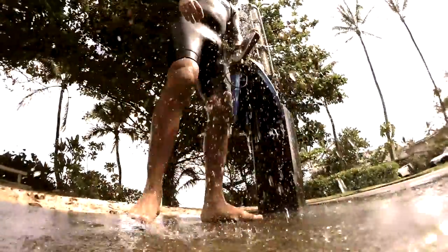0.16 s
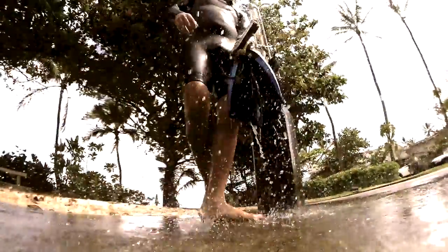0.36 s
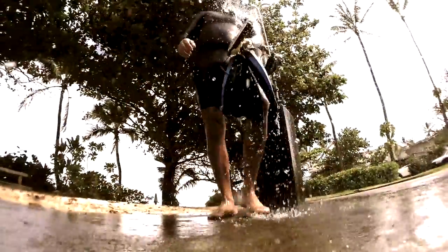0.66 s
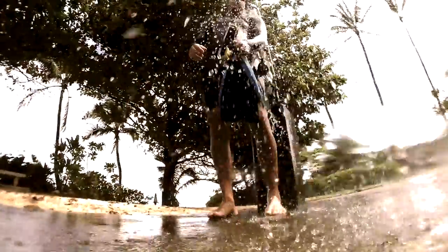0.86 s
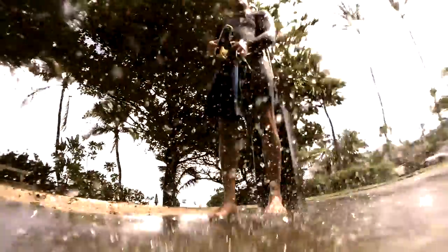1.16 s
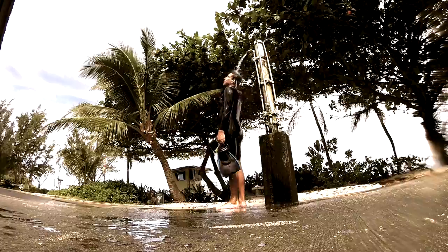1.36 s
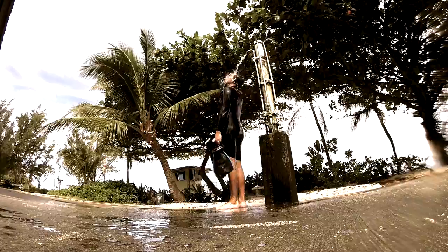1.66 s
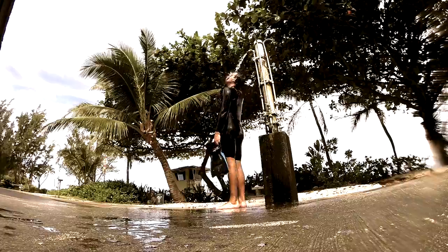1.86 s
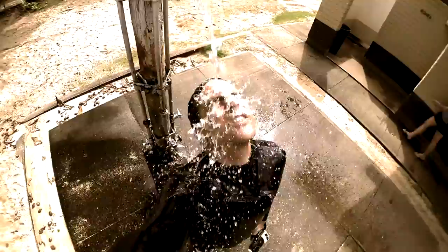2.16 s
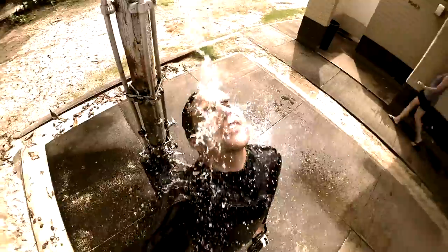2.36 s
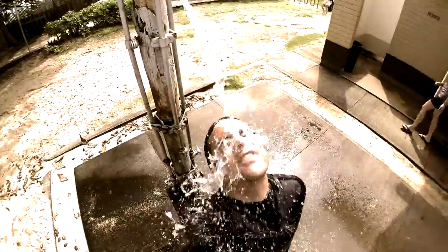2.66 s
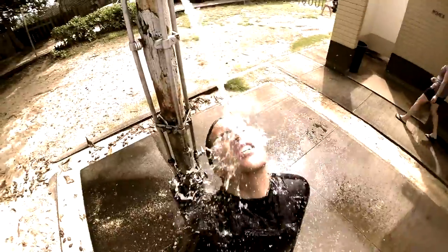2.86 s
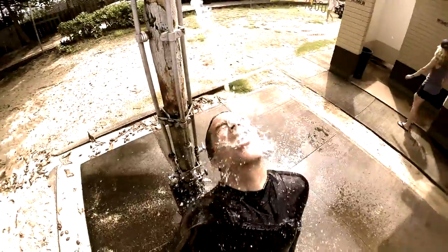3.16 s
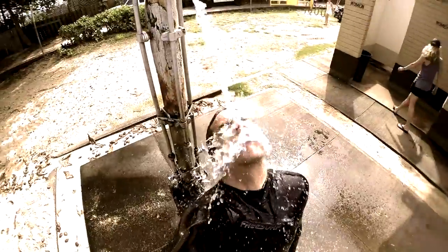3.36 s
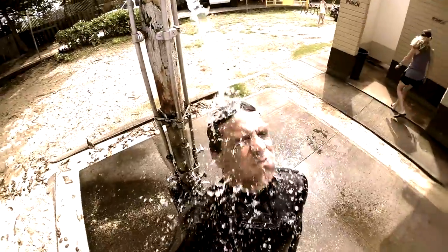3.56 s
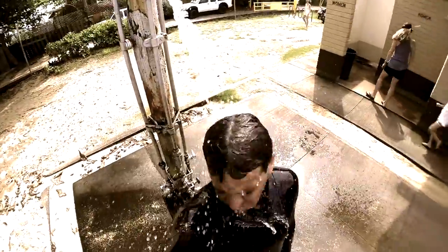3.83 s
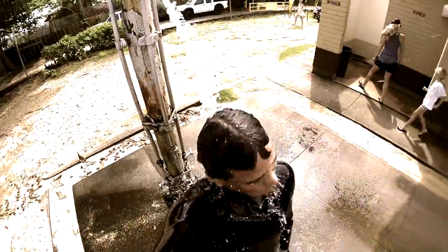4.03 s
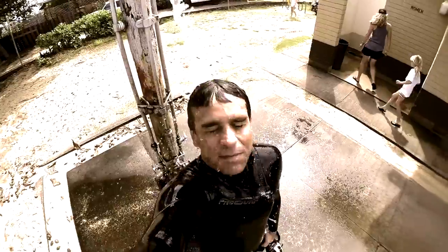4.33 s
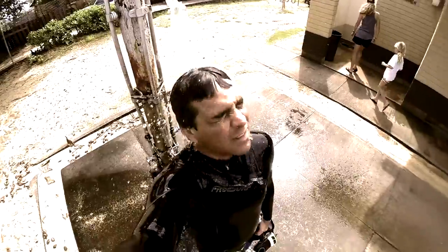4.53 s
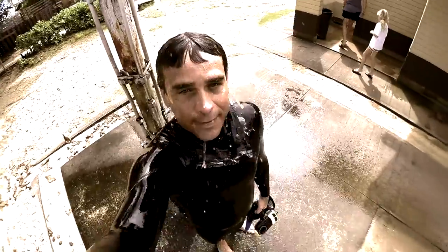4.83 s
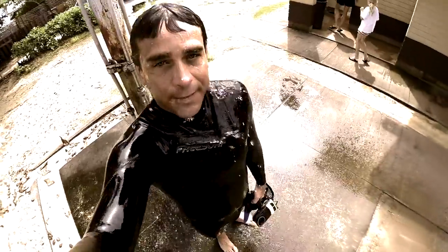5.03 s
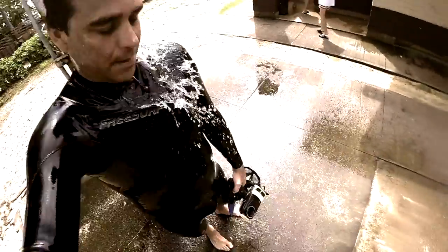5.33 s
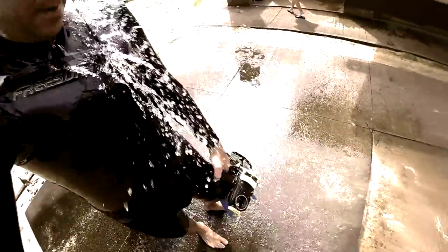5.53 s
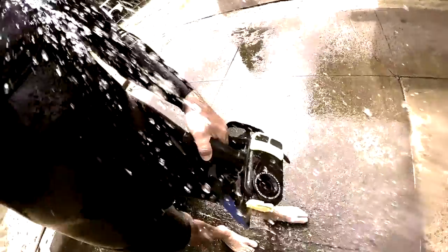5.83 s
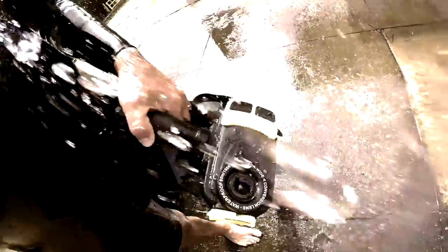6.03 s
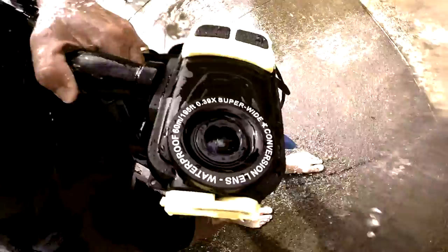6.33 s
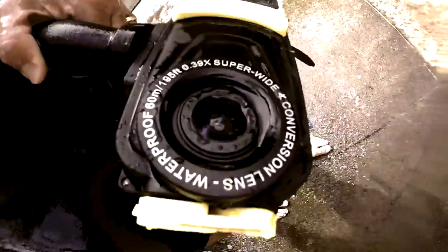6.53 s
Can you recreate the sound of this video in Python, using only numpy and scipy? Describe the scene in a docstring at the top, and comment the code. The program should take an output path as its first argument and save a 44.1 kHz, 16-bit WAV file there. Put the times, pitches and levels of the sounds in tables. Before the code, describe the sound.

An outdoor shower heard from inside a small waterproof housing. Spray sizzles and drops patter on wet concrete at once, over a faint hollow hiss. Big drops tick and thump on the casing, crowding into a dense splashing burst before the middle. The water thins almost to nothing, then returns with a few very hard smacks, thins again, and ends on a loud wet knock. Louder on the left.

```python
"""An outdoor shower on a bather and wet concrete, heard from inside a small waterproof camera housing.
From the start the shower head hisses (toned noise), small drops patter and fine spray sizzles on the ground
(showers of tuned noise bursts). Big drops soon smack the housing, which ticks, rings and thumps (tuned modes).
Then gushes fly off the bather (swells of patter and spray) and jolts shake the housing (damped low modes).
The water thins mid-way, then returns; the hardest smacks make the camera's gain control duck."""
import sys
import numpy as np
from scipy import signal
from scipy.fft import rfft, irfft
from scipy.io import wavfile
from scipy.ndimage import uniform_filter1d, minimum_filter1d

SR = 44100
rng = np.random.default_rng(int(sys.argv[2]) if len(sys.argv) > 2 else 0)


def generate_wav(sig):
    """Save sig (samples, or channels by samples) to the path in sys.argv[1] as 16-bit PCM at SR."""
    pcm = np.round(np.clip(np.atleast_2d(sig).T, -1, 1) * 32767).astype(np.int16)
    wavfile.write(sys.argv[1], SR, pcm)


N = 294840  # length in samples
SPLAT_S = .006  # window for the level of a splat and for the gain control's meter


def undb(db):
    """Decibels to gain."""
    return 10 ** (np.asarray(db) / 20)


def unit(x):
    """Scale to rms 1."""
    return x / np.sqrt(np.mean(x ** 2))


def bins(size):
    """Frequencies in Hz of a spectrum of that many samples, kept above zero."""
    return np.maximum(np.arange(size // 2 + 1), 1e-3) * SR / size


def colour(points, f):
    """Gain at frequencies f of an outline in f/Hz, level/dB, drawn over log frequency."""
    hz, db = np.transpose(points)
    return undb(np.interp(np.log(f), np.log(hz), db))


def resonance(f, hz, width):
    """Response of one damped mode, gain 1 at its centre."""
    return 1 / (1 + 1j * (f * f - hz * hz) / (f * width))


def body(f, modes):
    """The direct sound plus the ringing of some modes."""
    ringing = sum(undb(db) * resonance(f, hz, width) for hz, width, db in modes)
    return 1 + ringing


# Outline of the hiss before its tones: f/Hz, level/dB
JET_COLOUR = [(40, 5), (150, -3.5), (400, -4), (850, -13.5), (1200, -16), (2700, -9.5), (3400, -17.5),
              (5500, -15.5), (7000, -25.5), (15000, -32)]
# Hollow tones in the hiss: f/Hz, width/Hz, level/dB over the plain hiss
JET_TONES = [(633, 24, 6.5), (1018, 19, 19.5), (1470, 49, 12), (2030, 33, 10), (2960, 46, -8),
             (2840, 53, 9), (4120, 160, 5), (5470, 120, 4)]
JET_DB = -55  # rms level of the hiss


def jet():
    """Water rushing through the shower head: a smooth hiss with hollow tones."""
    f = bins(N)
    noise = rfft(rng.standard_normal(N))
    hiss = noise * colour(JET_COLOUR, f) * body(f, JET_TONES)
    return unit(irfft(hiss, N)) * undb(JET_DB)


# Water landing near the camera: t/s, patter level/dB, fine spray level/dB
WATER_FLOW = [(0, -43.5, -40.5), (0.328, -45, -44), (0.701, -40, -40), (1.19, -50.5, -44),
              (1.35, -45.5, -54.5), (1.9, -46.5, -51.5), (2.2, -61.5, -55.5), (2.65, -45.5, -51),
              (3, -57.5, -62.5), (3.4, -69, -67), (3.72, -57, -53.5), (4, -64, -54.5), (4.15, -50.5, -48.5),
              (5.28, -51, -49.5), (5.5, -59, -59), (5.95, -51, -49), (6.3, -55, -53), (6.68, -51, -49)]


def flow(column):
    """Gain of the patter (1) or the spray (2) that lands nearby, gliding between levels in dB."""
    rows = np.array(WATER_FLOW)
    return undb(np.interp(np.arange(N) / SR, rows[:, 0], rows[:, column]))


CROWDING = .65  # drops per second grow as this power of the water's gain


def clicks(rate, spread_db, water):
    """Impacts at random moments, many small and a few large; they thin out where there is less water."""
    count = int(rate * N / SR) + 1
    when, size, sign, luck = rng.random((count, 4)).T
    at = (when * N).astype(int)
    crowd = (water[at] / water.max()) ** CROWDING
    strength = undb(spread_db * size ** 3) * np.sign(sign - .5)
    # the fewer impacts that land are made stronger, so the average power holds
    landed = strength * (luck < crowd) / np.sqrt(crowd)
    return unit(np.bincount(at, landed, N))


def smear(x, decay_s):
    """Turn each impact into a ragged little burst of noise with an exponential decay."""
    energy = signal.lfilter([1], [1, -np.exp(-2 / (decay_s * SR))], x ** 2 + 1e-18)
    return unit(np.sqrt(energy) * rng.standard_normal(N))


# Ringing modes of the housing: f/Hz, width/Hz, level/dB over the direct sound
HOUSING_MODES = [(358, 7.9, -0.5), (1067, 49, -0.5), (1590, 420, 0.5), (1780, 250, -15.5), (2470, 540, 2),
                 (2800, 59, -0.5), (3510, 450, -3), (4435, 690, 4), (5706, 250, 5.5), (7230, 170, -5.5)]


def housing(f):
    """The housing passes the direct sound and rings at its own modes."""
    return body(f, HOUSING_MODES)


def shower(points, water, rate, spread_db, sharpness, burst_s, count):
    """A rain of drops in several sizes; each size bursts around its own pitch."""
    f = bins(N)
    pitches = np.geomspace(points[0][0], points[-1][0], count)
    rain = 0
    for hz in pitches:
        bursts = smear(clicks(rate / count, spread_db, water), burst_s)
        tuning = resonance(f, hz, hz / sharpness) ** 2
        rain = rain + colour(points, hz) / np.sqrt(hz) * tuning * rfft(bursts)
    return water * unit(irfft(rain * housing(f), N))


THUMP_HZ, THUMP_T60_S = 203.2, .11  # pitch, time to fall 60 dB


def thump(x):
    """The lowest mode of the housing: a short hollow knock."""
    t = np.arange(SR // 4) / SR
    ring = np.sin(2 * np.pi * THUMP_HZ * t) * np.exp(-np.log(1000) * t / THUMP_T60_S)
    # a small wall radiates little below its own pitch
    bass_cut = signal.butter(1, THUMP_HZ / 2, "high", fs=SR, output="sos")
    ring = signal.sosfilt(bass_cut, ring)
    return signal.fftconvolve(x, ring)[:N]


# Pitch balance of the small drops, before the housing rings: f/Hz, level/dB
PATTER_COLOUR = [(680, -2), (1500, 3), (2400, 3), (3400, -28), (6000, -17), (13000, -14.5)]
# Pitch balance of the fine spray, before the housing rings: f/Hz, level/dB
SPRAY_COLOUR = [(2800, -15), (4300, 6.5), (5700, -5), (7000, -1), (13000, -11)]
GUSH_SPRAY_DB = -2  # spray carried by a gush, against its patter


def small_drops(knock_db=-6, rumble_db=-15, rumble_hz=260, rumble_width_hz=700):
    """Patter and fine spray; the spray also keeps the housing knocking softly."""
    gush = gushes()
    coarse = np.hypot(flow(1), gush)
    fine = np.hypot(flow(2), undb(GUSH_SPRAY_DB) * gush)
    patter = shower(PATTER_COLOUR, coarse, rate=1700, spread_db=25, sharpness=1.55, burst_s=0.0024, count=10)
    spray = shower(SPRAY_COLOUR, fine, rate=2600, spread_db=27.5, sharpness=1.9, burst_s=0.0012, count=7)
    taps = clicks(rate=400, spread_db=14, water=fine)
    knocking = undb(knock_db) * unit(thump(taps))
    rumble = irfft(rfft(taps) * resonance(bins(N), rumble_hz, rumble_width_hz), N)
    return patter + spray + fine * (knocking + undb(rumble_db) * unit(rumble))


def splat_level(x, db):
    """Set each row to a level taken over the length of one splat."""
    loudness = np.sqrt(np.sum(x ** 2, axis=1, keepdims=True) / (SPLAT_S * SR))
    return x * undb(db)[:, None] / loudness


# Big drops on the housing: t/s, splat level/dB, splat f/Hz, spreading time/s,
# slap level/dB (before slap_db), level/dB of the impulse that drives the thump
BIG_DROPS = [(.142, -28, 4130, 0.00087, -33.5, -42), (0.203, -28, 1500, 0.0077, -26, -62),
             (.229, -18, 1920, 0.00093, -41, -33), (.231, -24, 3180, 0.0025, -46, -44),
             (0.3079, -21, 4030, 0.00049, -27.5, -36.5), (0.453, -30.5, 3940, 0.00046, -44.5, -47),
             (.503, -26.5, 1065, 0.0009, -32.5, -28.5), (0.708, -31, 1850, 0.0023, -31.5, -33),
             (0.8212, -21.5, 3940, 0.00087, -29.5, -29.5), (0.9347, -25.5, 1790, 0.0014, -26, -26.5),
             (1.3776, -28, 3000, 0.00039, -33, -66), (1.49, -25.5, 1340, 0.0037, -37.5, -55),
             (1.566, -37, 1930, 0.002, -42, -36.5), (1.6239, -26, 1350, 0.0055, -33.5, -33.5),
             (1.7053, -24, 1900, 0.0015, -31, -34), (1.744, -31.5, 1780, 0.0079, -37.5, -24.5),
             (1.93, -37, 2200, 0.0014, -43.5, -67), (1.9664, -28.5, 1900, 0.0039, -34, -34.5),
             (2.084, -37, 1410, 0.0023, -41, -45), (2.109, -35, 1320, 0.002, -52, -38.5),
             (2.232, -39, 1400, 0.00045, -44.5, -41), (2.294, -30, 1610, 0.0015, -38, -36),
             (2.311, -25.5, 1920, 0.00097, -46, -31), (2.361, -24.5, 1120, .0044, -22, -22),
             (2.3917, -23.5, 2500, 0.0011, -56, -48), (2.424, -28.5, 1990, 0.0018, -32.5, -41),
             (2.4696, -17, 1030, 0.00033, -22.5, -20.5), (2.539, -22.5, 3380, 0.00076, -26.5, -28),
             (2.554, -21, 1900, 0.0016, -28, -45), (2.5774, -21.5, 4150, 0.0023, -52, -48),
             (2.589, -27, 2630, 0.0024, -34, -30), (2.624, -18.5, 1500, 0.0013, -20, -21.5),
             (2.942, -38, 940, 0.0024, -48, -57), (3.08, -40, 1330, 0.00026, -54, -62),
             (3.237, -49, 4770, .0008, -70, -70), (3.465, -44.5, 1390, 0.0029, -58, -47.5),
             (3.663, -39, 1500, 0.0016, -54, -65), (4.034, -45, 5000, .002, -62, -55),
             (4.087, -41, 4050, .0027, -68, -43.5), (4.121, -37.5, 5600, 0.004, -69, -42),
             (4.183, -37.5, 2020, .002, -49, -38), (4.235, -20, 1920, 0.011, -33.5, -40),
             (4.255, -22, 3020, 0.001, -55, -30), (4.279, -30, 4200, 0.00046, -46, -51),
             (4.287, -11, 2500, 0.0027, -39, -17.5), (4.288, -21, 1170, 0.00086, -45, -45),
             (4.394, -34, 1690, 0.0052, -40, -22.5), (4.49, -32.5, 2470, 0.0033, -37.5, -29.5),
             (4.613, -33, 2030, .005, -48, -41), (4.8834, -29, 2220, 0.0017, -56, -45),
             (4.9147, -35, 2300, 0.00038, -38, -27.5), (4.9965, -24, 2150, 0.00023, -25, -36),
             (5.0446, -1.5, 1390, 0.00026, -54, -14), (5.046, -6.5, 3180, 0.00028, -41, -52),
             (5.236, -30.5, 2776, 0.00062, -35.5, -58), (5.2719, -22, 2300, 0.0015, -46, -38),
             (5.338, -30.5, 1350, 0.011, -58, -47.5), (5.367, -33.5, 2170, 0.0009, -49, -49),
             (5.4117, -34.5, 1160, 0.0035, -48, -48), (5.466, -36, 1170, 0.0012, -36, -33),
             (5.538, -37, 2800, 0.00056, -63, -65), (5.569, -39.5, 1470, 0.0012, -43, -41),
             (5.589, -38.5, 1580, .0027, -48, -29.5), (5.635, -34.5, 1330, 0.00037, -65, -62),
             (5.992, -36.5, 2320, 0.00069, -69, -38), (6.045, -41.5, 1920, 0.0032, -64, -30),
             (6.172, -36, 1700, 0.0013, -39.5, -44.5), (6.282, -38.5, 1890, .0013, -82, -45),
             (6.438, -24.5, 1450, 0.0017, -35, -36), (6.4931, -23.5, 3800, 0.00038, -29.5, -38),
             (6.5753, -31, 1370, 0.0012, -49, -40), (6.61, -9.5, 2270, 0.0016, -33, -15.5)]
OVERTONE_TOP_HZ = 4160  # the overtone of the wet wall goes no higher
FIZZ_DB, WET_FIZZ_DB = -20.5, -12.5  # fizz against its splat, on a drained and a streaming wall
STREAMING_DB = -63  # gush level that floods the wall


def big_drops(scatter=0.85, tail_s=0.0028, tail=0.13, sharpness=2.05, overtone=1.86, overtone_db=-10,
              push_s=0.0001, rebound_s=0.0013, fizz_hz=9000, fizz_width_hz=7000, slap_db=2, size=2048):
    """Each drop pushes on the wall, bursts into a pitched splat and throws off a fizz of droplets."""
    when, level, pitch, spread, slap, knock = np.transpose(BIG_DROPS)
    start = np.maximum(when * SR, 0).astype(int)
    pitch, spread = pitch[:, None], np.abs(spread[:, None])
    t, f = np.arange(size) / SR, bins(size)
    noise = rng.standard_normal((len(when), 2, size))
    wall = housing(f)

    # a sharp first contact, then the ragged spreading of the water
    spreading = scatter * np.exp(-t / spread) + tail * np.exp(-t / tail_s)
    burst = (t == 0) + noise[:, 0] * spreading
    # the wet wall gives at one pitch and a weaker higher one, both gone in a few cycles
    high_pitch = np.minimum(pitch * overtone, OVERTONE_TOP_HZ)
    low = resonance(f, pitch, pitch / sharpness) ** 2
    high = resonance(f, high_pitch, high_pitch / sharpness) ** 2
    splats = irfft(-rfft(burst) * (low + undb(overtone_db) * high) * wall)

    # the weight of the drop is one blunt pulse, and the wall springs back more slowly
    press = t * np.exp(-t / push_s) / push_s ** 2
    rebound = t * np.exp(-t / rebound_s) / rebound_s ** 2
    push = irfft(rfft(rebound - press) * wall)[None]

    # droplets fly off for as long as the water spreads, and more of them from a streaming wall
    flying = rfft(noise[:, 1] * np.exp(-t / spread))
    droplets = irfft(flying * resonance(f, fizz_hz, fizz_width_hz) ** 2 * wall)
    fizz = level + np.interp(gushes()[start], [0, undb(STREAMING_DB)], [FIZZ_DB, WET_FIZZ_DB])

    hits = splat_level(splats, level) + splat_level(push, slap + slap_db) + splat_level(droplets, fizz)
    places = start[:, None] + np.arange(size)
    ticks = np.bincount(places.ravel(), hits.ravel(), N)[:N]
    return ticks + thump(np.bincount(start, undb(knock), N))


# Gushes thrown off the bather: t/s, length/s from start to draining, level/dB
GUSHES = [(0.926, 0.022, -37.5), (1.709, 0.048, -39.5), (2.335, .27, -41), (4.231, 0.072, -40.5),
          (4.605, .15, -49)]
GUSH_RISE_S, GUSH_DRAIN_S = 0.0068, .06  # ramp up, decay constant of the drain


def gushes():
    """Gain of the gushes: each arrives fast, holds and drains away."""
    t = np.arange(N) / SR
    gain = 0
    for start, length, db in GUSHES:
        rise = np.clip((t - start) / GUSH_RISE_S, 0, 1)
        drain = np.exp(-np.maximum(t - start - length, 0) / GUSH_DRAIN_S)
        gain = gain + undb(db) * rise * drain
    return gain


# Dull bumps of the housing: t/s, peak level/dB
BUMPS = [(2.029, -38), (4.24, -31), (6.438, -25.5), (6.493, -31)]
# How the whole housing shakes when bumped, before the grip softens it: f/Hz, width/Hz, level/dB
SHAKE_MODES = [(40.6, 13, 13.5), (119, 86, 8), (332, 44, -14)]


def bumps():
    """The hand-held housing is jolted and shudders briefly in a few damped low modes."""
    when, db = np.transpose(BUMPS)
    f = bins(N)
    shake = sum(undb(gain_db) * resonance(f, hz, width) for hz, width, gain_db in SHAKE_MODES)
    # the soft grip takes the edge off each jolt, above the highest mode
    shake = shake / (1 + 1j * f / SHAKE_MODES[-1][0]) ** 2
    jolts = np.bincount((when * SR).astype(int), undb(db), N)
    return irfft(rfft(jolts) * shake, N) / np.abs(irfft(shake, N)).max()


LIMIT_DB, LIMIT_HOLD_S, LIMIT_RELEASE_S = -15, 0.066, 0.25  # threshold, hold, release constant


def gain_control(sound):
    """A hit over the limit turns everything down; the gain stays low for a moment, then creeps back."""
    power = uniform_filter1d(sound.mean(axis=0) ** 2, int(SPLAT_S * SR))
    over_db = np.maximum(10 * np.log10(np.maximum(power, 1e-18)) - LIMIT_DB, 0)
    hold = int(LIMIT_HOLD_S * SR)
    held_db = -minimum_filter1d(-over_db, hold, origin=(hold - 1) // 2, mode="constant")
    # each held cut shrinks exponentially in dB until a larger one takes over
    fade = np.exp(-np.arange(N) / SR / LIMIT_RELEASE_S)
    cut_db = fade * np.maximum.accumulate(held_db / fade)
    return sound * undb(-cut_db)


LEFT_DB = 7.65  # left channel over right


def scene():
    """One microphone hears it all, louder in the left channel."""
    sides = np.array([[undb(LEFT_DB)], [1]])
    return sides / sides.mean() * (jet() + small_drops() + big_drops() + bumps())


CEILING, TOP_HZ = .8, 15000  # peak amplitude the rounding approaches, edge of the top cut


def record(dry, low_hz=28):
    """The camera drops the deepest bass, ducks after the hardest hits, rounds their peaks and cuts the top."""
    bass_cut = signal.butter(2, low_hz, "high", fs=SR, output="sos")
    sound = gain_control(signal.sosfilt(bass_cut, dry))
    # both channels share the peak rounding
    sound = sound / (1 + (np.abs(sound).max(axis=0) / CEILING) ** 4) ** (1 / 4)
    top_cut = signal.ellip(8, .2, 70, TOP_HZ, fs=SR, output="sos")
    return signal.sosfilt(top_cut, sound)


dry = scene()
out = record(dry)
generate_wav(out)
```